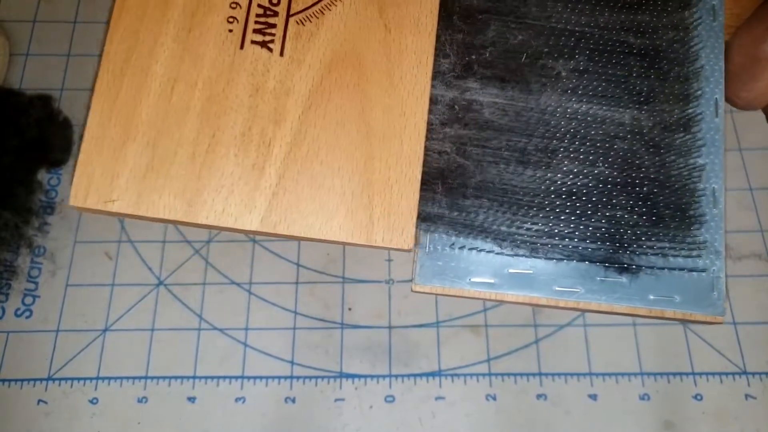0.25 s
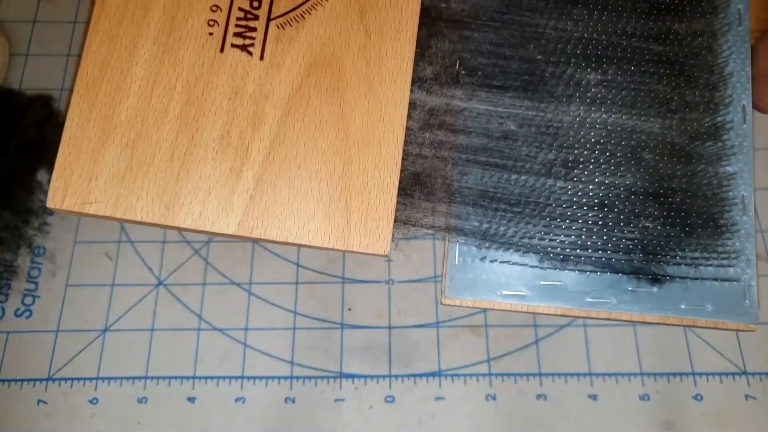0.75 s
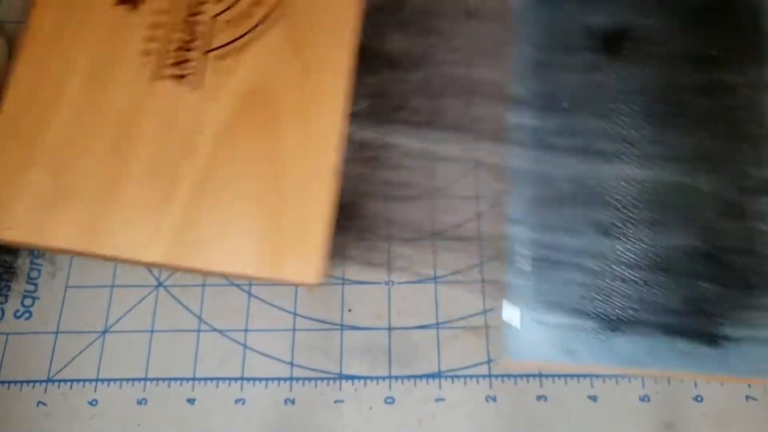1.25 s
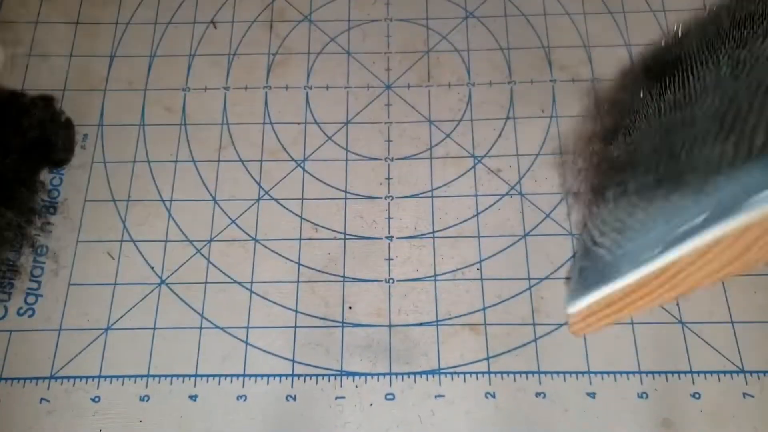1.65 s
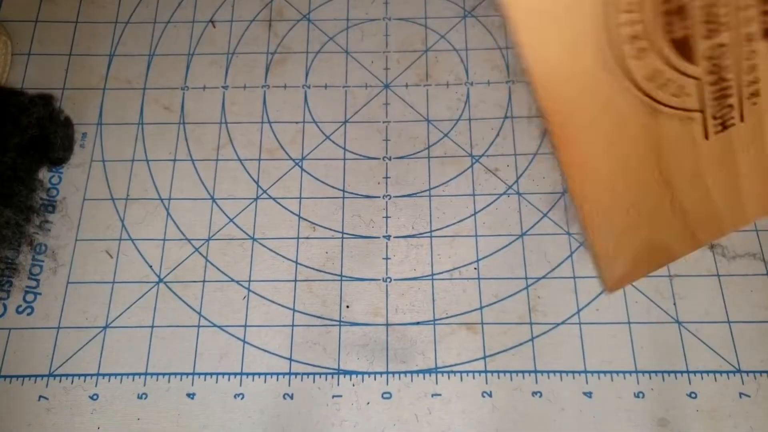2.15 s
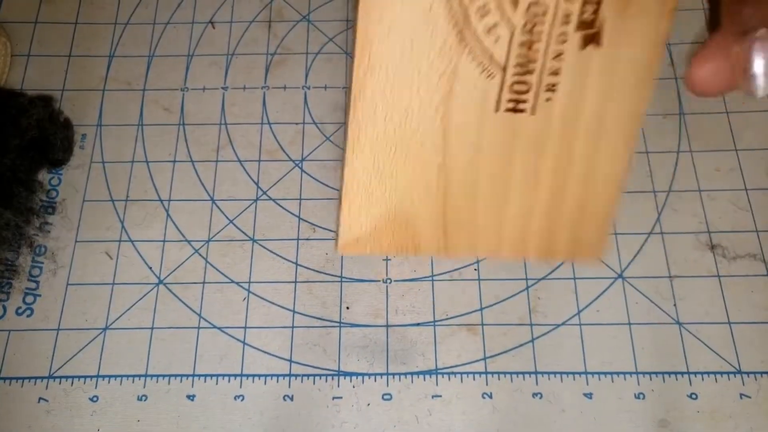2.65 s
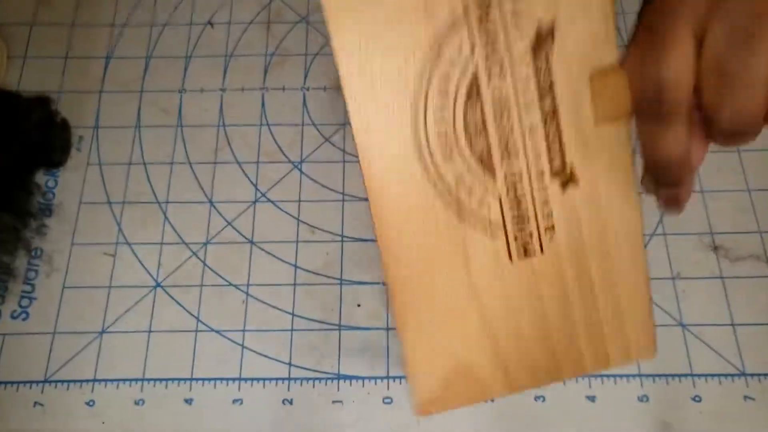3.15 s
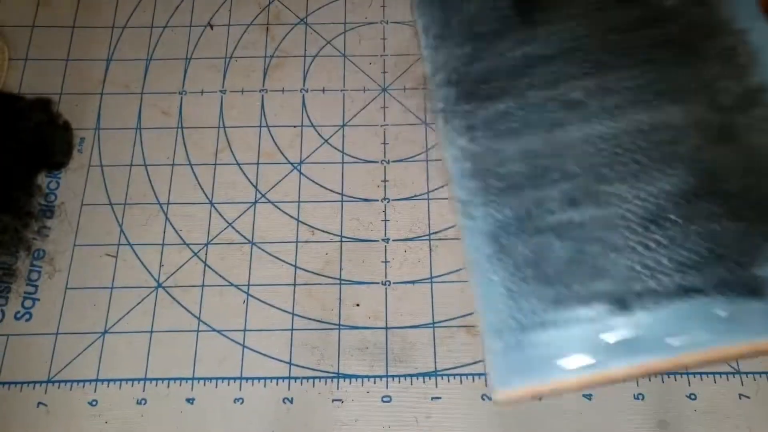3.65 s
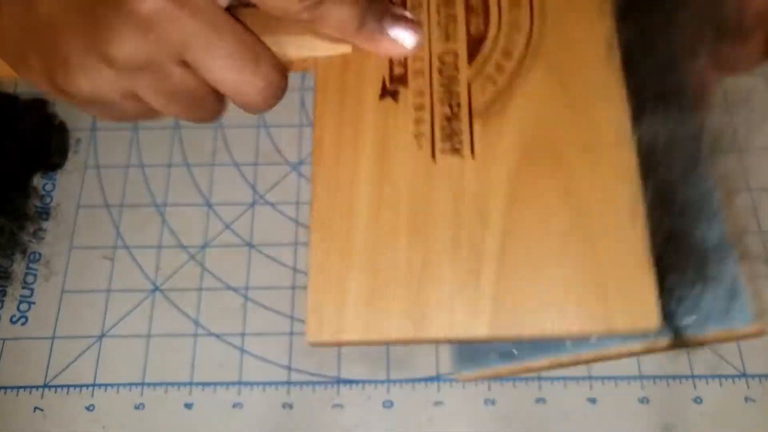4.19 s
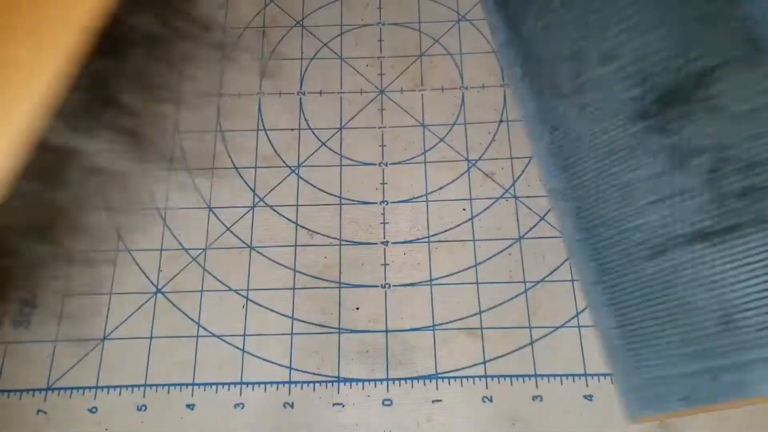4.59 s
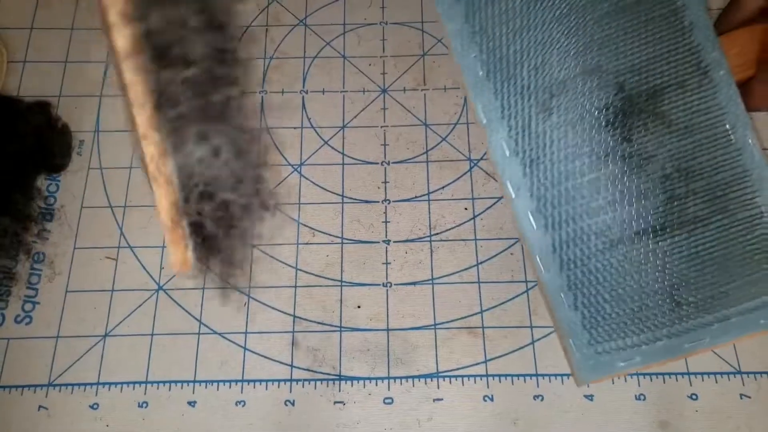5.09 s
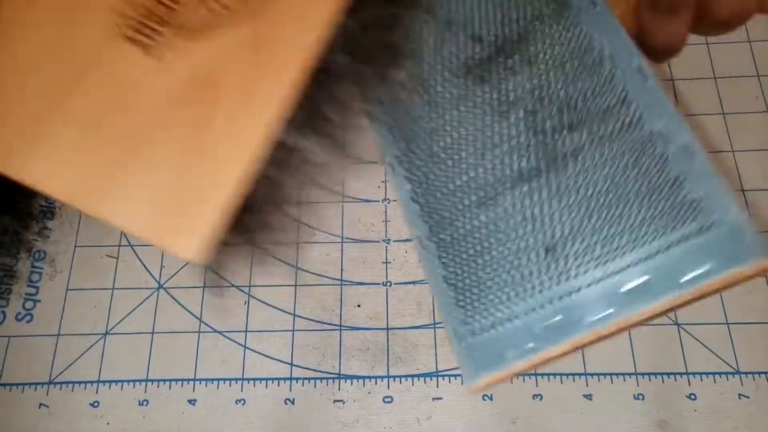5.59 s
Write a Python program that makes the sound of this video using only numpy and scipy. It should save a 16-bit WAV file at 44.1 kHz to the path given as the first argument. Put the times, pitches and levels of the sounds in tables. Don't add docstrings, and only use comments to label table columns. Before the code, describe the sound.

A close stereo microphone in a quiet room, with low building rumble and very faint hiss. From 0 to 0.5 s wire teeth draw softly through wool, a fine dry scratch with woody body and airy hiss; a short pull follows at 0.6-0.8 s, and a swelling one at 0.9-1.4 s, strongest near 1.25 s. From 1.7 to 2.8 s only faint skin rubs and handle squeezes, with a small woody tick at 2.07 s. At 2.83 s a paddle hits the table hard: bright crack, deep thump, short room tail; a softer knock follows at 3.08 s. Slight rubbing continues, with a tiny sharp click at 3.37 s. At 3.97 s teeth catch in a loud rattling snap, with an edge tap at 4.10 s and coarse scraping that swells around 4.2 s and fades by 4.5 s. Near silence, then a final crackly, uneven scrape at 5.43-5.75 s.

```python
import sys
import numpy as np
from scipy import signal
from scipy.fft import rfft, irfft
from scipy.io import wavfile

SR = 44100
rng = np.random.default_rng(int(sys.argv[2]) if len(sys.argv) > 2 else 0)


def gain_from_decibels(decibels):
    exponent = np.asarray(decibels, float) / 20
    return 10 ** exponent


def generate_wav(signal):
    frames = np.transpose(np.atleast_2d(signal))
    scaled = np.clip(frames, -1, 1) * 32767
    pcm = np.round(scaled).astype(np.int16)
    wavfile.write(sys.argv[1], SR, pcm)


N = 257103

# time_s, level_db, brightness_db
RUMBLE = [
    [(0.0, -61, 3), (0.39, -58.5, -7.5), (0.66, -64.5, 1), (1.08, -57.5, -3), (1.73, -59, -8),
     (2.15, -64.5, -3), (2.7, -57, -5.5), (3.25, -60, -3), (3.72, -64, -6.5), (3.95, -67.5, 1),
     (4.7, -65, 4.5), (5.13, -65, 3), (5.4, -60.5, -1), (5.83, -62.5, 8)],
]
# pitch_hz, level_db [dB per Hz]
DEEP_RUMBLE = [(20, -32), (32, -17), (45, 4.5), (62, 2), (95, -3), (130, -25), (200, -48)]
UPPER_RUMBLE = [(60, -38), (100, -8), (140, 1), (210, 1), (270, -7.5), (360, -15.5), (500, -28.5),
                (800, -59)]
# pitch_hz, level_db [dB per Hz]
MIC_HISS = [(260, -31), (450, -13.5), (680, -19), (1780, -23.5), (1950, -22.5), (2330, -22.5), (6730, -41),
            (16000, -24.5)]
MIC_HISS_DB = -79

# pitch_hz, likeness [1 = same]
FLOOR_LIKENESS = [(60, 0.91), (240, 0.87), (950, -1.3), (3770, -0.8), (15000, -0.9)]
NEAR_LIKENESS = [(60, -0.92), (180, 1), (550, 0.83), (1650, 0.47), (4970, 0.041), (15000, -1.7)]
HIT_LIKENESS = [(200, 0.95), (800, 0.85), (2000, 0.75), (5000, .6), (12000, .4)]
# pitch_hz, left_minus_right_db
LEFT_SHADOW = [(60, 2.5), (130, -8.5), (290, 0.5), (640, -3.5), (1410, -4), (3100, -8), (6820, -8),
               (15000, -23.5)]

# start_s, crack_db, thump_db, contact_ms, tail_db
KNOCKS = [
    (2.8287, -27, -3.5, 3.4, -34),
    (3.0826, -33, -11, 4.5, -38),
    (4.1015, -27.5, -33, 1.16, -57),
    (5.438, -54.5, -39, 2.06, -59),
]
# pitch_hz, level_db, t60_s
TABLE_MODES = [(43.97, -24.5, .2), (77.4, -13, 0.11), (110.7, -13, 0.11), (143, -14.5, 0.035),
               (200, -14.5, 0.038), (247.5, -23.5, 0.21), (335, -19, 0.049), (354, -18, .07),
               (450, -37.5, .05)]
# start_s, peak_db, pitch_hz, t60_s
TABLE_PUSHES = [
    (1.501, -41, 78.6, 0.058),
    (3.601, -43.5, 52.8, 0.22),
    (4.341, -41, 53, 0.25),
]
# pitch_hz, level_db [dB per Hz]
CRACK_COLOUR = [(200, -17), (800, 7), (1300, 1), (2000, 4), (3000, -9), (5000, -8.5), (9000, -15),
                (15000, -12.5)]
# pitch_hz, t60_s, level_db
ROOM_TAIL = [(179, .2, 7.5), (313, 0.16, 7), (545, 0.22, -6.5), (1100, 0.061, -7.5), (1750, 0.17, -10.5),
             (3350, 0.13, -12.5), (5500, 0.052, -9), (12100, 0.062, -12)]
HAZE_DB, HAZE_HOLD_MS, HAZE_T60_MS = -19.5, 33, 170
FLAT_MS, TILT_PER_CONTACT, THUMP_SKEW = 1.04, 1.3, 0.75

# start_s, peak_db, pitch_hz, ring_t60_ms
STRUCK_MODES = [(2.828, -28, 3100, 22), (2.8283, -32.5, 8500, 5.1), (2.8283, -32, 12000, 3),
                (2.832, -30, 500, 23), (4.1035, -33, 320, 20), (2.838, -44, 3070, 60),
                (2.828, -38, 5400, 12), (3.0825, -39.5, 754, 37), (3.0825, -42, 1800, 25),
                (3.086, -46, 1550, 27), (2.828, -30, 1800, 22), (2.827, -38.5, 3870, 16),
                (2.8286, -31.5, 860, 38), (2.838, -42, 1500, 57), (2.8285, -34.5, 1600, 20),
                (2.834, -35.5, 430, 80), (3.083, -30.5, 1330, 26), (3.095, -47, 1960, 77),
                (3.0828, -45, 2600, 18), (3.1498, -46, 2000, 28), (3.158, -57, 3860, 25),
                (3.159, -52, 1950, 45), (3.159, -56, 2950, 20), (4.0343, -38, 1200, 29),
                (4.0337, -39, 4200, 5), (4.0515, -34, 4200, 5), (4.0515, -40, 6700, 4),
                (4.1022, -34, 2070, 8), (4.1033, -39, 7400, 5.4), (4.1022, -42, 4000, 5.6),
                (3.636, -54, 13500, 3), (3.632, -60, 12000, 3), (4.0338, -34, 2500, 5),
                (3.369, -49, 6000, 2.9)]
# start_s, peak_db, pitch_hz, ring_t60_ms
BUMPS = [(2.0739, -39.5, 2660, 7.1), (2.0735, -51.5, 990, 17), (2.171, -53.5, 760, 13),
         (2.829, -25.5, 4880, 4), (3.082, -38, 4880, 13), (3.368, -53, 753, 35), (3.368, -47.5, 950, 17),
         (3.3687, -25, 13600, 1.6), (4.0337, -26, 2350, 2.6), (4.078, -46, 1290, 12),
         (4.1025, -33.5, 950, 11), (4.205, -34, 1100, 11), (5.438, -35.5, 395, 35)]
BUMP_MS, BUMP_BRIGHT_DB = 0.6, -23.5
# start_s, peak_db, pitch_hz, ring_t60_ms
TICKS = [(2.56, -70, 1930, 20), (3.1495, -60, 2020, 13), (3.984, -23, 373, 27), (4.0513, -31.5, 800, 8),
         (4.066, -44, 6200, 3.3), (5.478, -49, 2700, 5), (5.509, -48, 4300, 3), (5.607, -51, 1320, 10),
         (5.537, -48, 1700, 8), (5.535, -51, 4500, 5.4), (5.584, -50, 7160, 4)]
TICK_MS, TICK_BRIGHT_DB = 2.1, 0.5
# start_s, peak_db, pitch_hz, length_ms, bright_db
RATTLES = [(2.898, -40.5, 410, 23, -18), (3.157, -39.5, 450, 21, -18), (3.15, -43.5, 755, 8.7, -27),
           (3.9765, -26.5, 1120, 10, -10), (3.9815, -35.5, 3330, 1.6, -7), (4.1918, -41, 1100, 5.4, -12),
           (5.624, -45.5, 1360, 6.5, -15), (5.479, -44, 650, 8.8, -25), (3.9695, -35, 2500, 9.1, -1.5),
           (3.971, -31.5, 2100, 9.6, -5), (3.9695, -35, 1300, 8, -14.5), (3.972, -30, 820, 6, -20.5),
           (3.99, -39, 1100, 20, -20.5), (3.978, -30, 560, 10, -25), (3.9765, -27, 740, 12.4, -15),
           (3.979, -30.5, 450, 22, -20), (4.252, -44, 850, 13, -16), (4.291, -36, 830, 4.4, -11),
           (4.516, -47.5, 400, 14.3, -35), (5.437, -42.5, 1400, 4.4, -13), (5.477, -40.5, 1270, 14, -18),
           (5.517, -48, 870, 11, 4), (5.532, -47, 1230, 9.5, -4), (5.553, -38.5, 1420, 8, -18),
           (5.745, -49.5, 450, 14, -36), (5.768, -52.5, 260, 19, -40), (5.512, -49.5, 1900, 14, -4),
           (5.455, -46, 1270, 8, -13), (4.53, -58, 405, 40, -40)]
RATTLE_T60_MS = 24

# middle_s, length_ms, hiss_db, hollow_db, hollow_hz
GRIPS = [(1.752, 116, -69, -79, 4700), (1.852, 80, -62, -66, 3250), (1.97, 200, -72.5, -80.5, 2800),
         (2.055, 150, -65, -64.5, 2820), (2.02, 67, -100, -67, 3900), (2.055, 38, -100, -60.5, 3800),
         (2.065, 48, -100, -61, 5500), (2.15, 180, -78, -74.5, 3970), (2.25, 102, -72.5, -69, 5500),
         (2.34, 170, -82.5, -94, 4780), (2.441, 130, -65.5, -76.5, 3820), (2.585, 96, -83, -57, 14700),
         (2.7, 120, -92, -69, 14800), (2.779, 91, -65, -71, 4340), (2.969, 86, -81.5, -74.5, 4240),
         (3.159, 40, -66.5, -73, 4000), (3.216, 86, -75, -74, 4700), (3.33, 140, -74, -84, 4100),
         (3.385, 84, -66.5, -70, 3820), (3.47, 210, -66.5, -78, 4000), (3.55, 120, -83, -80.5, 3470),
         (3.647, 64, -84, -62, 12900), (3.61, 62, -97, -70.5, 14100), (3.72, 100, -100, -77.5, 13900),
         (4.601, 79, -82, -101, 5000)]
# middle_s, length_ms, level_db
SQUEEZES = [(1.751, 124, -78), (1.97, 140, -83), (2.149, 290, -75), (2.28, 180, -87), (2.443, 200, -77),
            (2.62, 270, -83.5), (2.78, 110, -71), (3.216, 79, -71.5), (3.389, 61, -64)]
# pitch_hz, level_db [dB per Hz]
SKIN_COLOUR = [(3000, -37.5), (5000, -9.5), (7000, -8.5), (9500, -11.5), (12000, -2), (15000, 2.5),
               (15700, -1)]

# time_s, effort_db [paddle level]
STROKES = [
    [(0.0, -62), (0.04, -61), (0.146, -64), (0.296, -62.5), (0.442, -71), (0.528, -69.5)],
    [(0.586, -61.5), (0.65, -57), (0.712, -59.5), (0.788, -78.5), (0.82, -86)],
    [(0.908, -76.5), (0.942, -69), (1.008, -64), (1.098, -64), (1.18, -61), (1.224, -54.5), (1.302, -54.5),
     (1.42, -89), (1.49, -101)],
    [(3.99, -41.5), (4.019, -51.5), (4.07, -53.5), (4.094, -63)],
    [(4.112, -57), (4.136, -58.5), (4.204, -48), (4.25, -54), (4.292, -53), (4.312, -57.5), (4.422, -62.5),
     (4.502, -85.5), (4.6, -99)],
    [(5.434, -53.5), (5.458, -56), (5.5, -57.5), (5.52, -53), (5.578, -59.5), (5.63, -54.5), (5.668, -58.5),
     (5.726, -79.5), (5.83, -92)],
]
# time_s, share [0-1]
MESH_SHARE = [(3.9, 0), (3.95, 1), (4.22, 0.75), (4.29, 0.22), (4.6, 0.12), (5.4, .9), (5.58, 0.76),
              (5.66, 0.2)]
# pitch_hz, width_hz, level_db
WOOL_PADDLE = [(306.4, 97, -11), (637, 69, -4.5), (850, 290, 1), (1078, 196, 2.5), (1347, 350, -8),
               (1897, 100, -14)]
MESHED_PADDLE = [(356, 110, -4.5), (534, 130, 0.5), (630, 240, 2.5), (950, 410, -2.5), (1290, 190, -2),
                 (1900, 830, -7)]
# pitch_hz, level_db [dB per Hz]
SCRATCH_COLOUR = [(1200, -29), (2000, -7.5), (3000, -7.5), (4500, -10), (6000, -5), (8000, -22.5)]
WOOL_FIBRE = [(3200, -22.5), (5600, -10), (7500, -3), (8500, -7.5), (9800, -9), (12000, -3.5), (15000, 1),
              (15700, 4.5)]
MESHED_FIBRE = [(4500, -29), (6200, 2.5), (7500, -2), (9800, -15), (12000, -6.5), (15000, -5),
                (15700, -0.5)]
# level_db [at -60 dB effort], slope [dB per dB]
WOOL_SCRATCH = (-76, 1.4)
WOOL_HISS = (-58.5, 0.86)
BARE_SCRATCH = (-66, 0.84)
BARE_HISS = (-68.5, 0.78)


def in_time(spans):
    time_s, *columns = np.transpose(np.concatenate(spans))
    return [np.interp(np.arange(N) / SR, time_s, column) for column in columns]


def at_hz(points, hz):
    points = np.array(points)
    return np.interp(np.log(hz + 1), np.log(points[:, 0]), points[:, 1])


def rms_one(x):
    return x / np.sqrt(np.mean(x ** 2) + 1e-20)


def colour(x, spectrum):
    size = 8192
    hz = np.arange(size // 2 + 1) * SR / size
    cepstrum = irfft(np.log(gain_from_decibels(at_hz(spectrum, hz))))
    cepstrum[1:size // 2] *= 2
    cepstrum[size // 2 + 1:] = 0
    impulse = irfft(np.exp(rfft(cepstrum)))
    return signal.fftconvolve(x, impulse[None], axes=-1)[:, :N]


def band_filter(x, order, hz, kind):
    return signal.sosfilt(signal.butter(order, hz, kind, fs=SR, output="sos"), x)


def ring(x, pitch_hz, t60_s):
    radius, turn = gain_from_decibels(-60 / (t60_s * SR)), 2 * np.pi * pitch_hz / SR
    return signal.lfilter([0, np.sin(turn)], [1, -2 * radius * np.cos(turn), radius * radius], x + 1e-18)


def drift(rate_hz):
    steps = rng.standard_normal(4000)
    return rms_one(np.interp(np.arange(N) / SR * rate_hz * 2, np.arange(len(steps)), steps))


def burst(start_s, length_ms, t60_ms):
    age = np.arange(N) / SR - start_s
    return (age >= 0) * gain_from_decibels(-60 * np.clip(age - length_ms / 1000, 0, 2) / (t60_ms / 1000))


def swell(cut, middle_s, length_ms):
    age = np.arange(N)[cut] / SR - middle_s
    return np.exp(-2 * (age / (length_ms / 2000)) ** 2)


def ports(pair, likeness, balance):
    hz = np.arange(N // 2 + 1) * SR / N
    alike = np.clip(at_hz(likeness, hz), 0, 1)
    first, second = rfft(pair)
    left = (alike * first + np.sqrt(1 - alike ** 2) * second) * gain_from_decibels(at_hz(balance, hz))
    return irfft([left, first], N)


def releases(per_s, spread_db):
    force_db = spread_db * np.minimum(rng.exponential(1, (2, N)), 5)
    sizes = gain_from_decibels(force_db) * rng.choice([-1, 1], (2, N))
    return sizes * (rng.random((2, N)) < per_s / SR)


def room_tone():
    deep_db, bright_db = in_time(RUMBLE)
    deep, upper, hiss = (rms_one(colour(rng.standard_normal((2, N)), spectrum))
                         for spectrum in (DEEP_RUMBLE, UPPER_RUMBLE, MIC_HISS))
    noise = gain_from_decibels(deep_db + 1.5 + 2.1 * drift(7.9)) * deep
    noise += gain_from_decibels(deep_db + bright_db + 2.0) * upper
    noise += gain_from_decibels(MIC_HISS_DB) * hiss
    return ports(noise, FLOOR_LIKENESS, [(60, -0.16), (250, -4.5), (700, 1.6), (2400, 4.0), (8000, -2.6)])


def table_thumps():
    t, push, dip = np.arange(N) / SR, np.zeros(N), np.zeros(N)
    for start_s, _, thump_db, contact_ms, _ in KNOCKS:
        delay_s = TILT_PER_CONTACT * (contact_ms - FLAT_MS) / 1000
        phase = np.clip((t - start_s - delay_s) / (contact_ms / 1000), 0, 1)
        push += gain_from_decibels(thump_db) * np.sin(np.pi * phase ** THUMP_SKEW) ** 2
        lead = np.clip((t - start_s) / (delay_s + 0.00039), 0, 1)
        dip -= gain_from_decibels(thump_db - 14.5) * np.sin(np.pi * lead)
    out = push + dip
    for pitch_hz, level_db, t60_s in TABLE_MODES:
        speed = np.gradient(ring(push, pitch_hz, t60_s)) * SR / (2 * np.pi * pitch_hz)
        out += gain_from_decibels(level_db - 38.5) * speed
    for start_s, peak_db, pitch_hz, t60_s in TABLE_PUSHES:
        age = np.clip(t - start_s, 0, 2)
        onset = 1 - np.exp(-age / 0.0013)
        out += gain_from_decibels(peak_db - 60 * age / t60_s) * onset * np.sin(2 * np.pi * pitch_hz * age)
    left = gain_from_decibels(0.5) * signal.lfilter([0.12], [1, -0.88], out)
    return np.array([left, out])


def knock_cracks():
    out, noise = np.zeros((2, N)), rng.standard_normal((2, N))
    crack = rms_one(colour(noise, CRACK_COLOUR))
    for start_s, crack_db, *_ in KNOCKS:
        out += gain_from_decibels(crack_db - 5.5) * burst(start_s, 0.28, 25) * crack
    for pitch_hz, t60_s, level_db in ROOM_TAIL:
        band = rms_one(band_filter(noise[::-1], 4, [pitch_hz * 0.76, pitch_hz * 1.32], "band"))
        for start_s, *_, tail_db in KNOCKS:
            out += gain_from_decibels(tail_db + level_db) * burst(start_s + 0.0033, 2.8, 1000 * t60_s) * band
    haze = band_filter(noise[:, ::-1], 2, 4200, "high")
    for start_s, *_, tail_db in KNOCKS:
        out += gain_from_decibels(tail_db + HAZE_DB) * burst(start_s + 0.009, HAZE_HOLD_MS, HAZE_T60_MS) * haze
    return out


def struck_paddle():
    out = np.zeros(N)
    for start_s, peak_db, pitch_hz, t60_ms in STRUCK_MODES:
        start, touch = int(start_s * SR), np.zeros(SR // 4)
        touch[:2] = 0.5
        out[start:start + len(touch)] += gain_from_decibels(peak_db) * ring(touch, pitch_hz, t60_ms / 1000)
    return out


def tooth_snaps():
    out, rattle = np.zeros((2, N)), releases(per_s=4600, spread_db=0.0)
    tick = rms_one(colour(rattle, CRACK_COLOUR))
    catches = [(*bump, BUMP_BRIGHT_DB, BUMP_MS) for bump in BUMPS]
    catches += [(*spring, TICK_BRIGHT_DB, TICK_MS) for spring in TICKS]
    catches += [(start_s, peak_db, pitch_hz, RATTLE_T60_MS, bright_db, length_ms)
                for start_s, peak_db, pitch_hz, length_ms, bright_db in RATTLES]
    for start_s, peak_db, pitch_hz, t60_ms, bright_db, length_ms in catches:
        cut = slice(int(start_s * SR), int((start_s + 0.2) * SR))
        shape = burst(start_s, length_ms, 6)[cut]
        force = rattle[:, cut] * shape
        force[:, 1] += 4.5 * min(1, 3.7 / length_ms)
        body = ring(force, pitch_hz, t60_ms / 1000)
        bright = gain_from_decibels(bright_db - 6.0) * shape * tick[:, cut]
        out[:, cut] += gain_from_decibels(peak_db) * (body / np.abs(body).max() + bright)
    return out


def hand_grips():
    out, rub = np.zeros((2, N)), rms_one(releases(per_s=9000, spread_db=2) * gain_from_decibels(drift(40)))
    skin = rms_one(colour(rub, SKIN_COLOUR))
    for middle_s, length_ms, hiss_db, hollow_db, hollow_hz in GRIPS:
        cut = slice(int((middle_s - 0.2) * SR), int((middle_s + 0.2) * SR))
        t60_s = 7 / hollow_hz
        hollow = rms_one(ring(ring(rub[:, cut], hollow_hz, t60_s), hollow_hz, t60_s))
        slide = gain_from_decibels(hiss_db + 10.5) * skin[:, cut] + gain_from_decibels(hollow_db) * hollow
        out[:, cut] += swell(cut, middle_s, length_ms) * slide
    firm = sum(gain_from_decibels(level_db) * swell(slice(None), middle_s, length_ms)
               for middle_s, length_ms, level_db in SQUEEZES)
    return out + firm * rms_one(ring(rub, 850, 0.0086))


def paddle(teeth, modes):
    out = 0
    for k, (pitch_hz, width_hz, level_db) in enumerate(modes):
        gain = (-1) ** k * gain_from_decibels(level_db) * np.sqrt(width_hz)
        out = out + gain * ring(teeth, pitch_hz, 1.52 / width_hz)
    return rms_one(out)


def follows(law, effort_db):
    level_db, slope = law
    return level_db + slope * (effort_db + 60)


def combing():
    effort_db, = in_time(STROKES)
    t, engaged = np.arange(N) / SR, np.ones(N)
    for stroke, following in zip(STROKES, STROKES[1:]):
        lift_s, land_s = stroke[-1][0], following[0][0]
        if land_s - lift_s > 0.25:
            engaged[(t > lift_s) & (t < land_s)] = 0
    fine = releases(per_s=5400, spread_db=0.0) * gain_from_decibels(0.35 * drift(33))
    coarse = rms_one(releases(per_s=1500, spread_db=4) * gain_from_decibels(3 * drift(60)))
    hairs = rms_one(releases(per_s=7800, spread_db=1.1))
    share = np.clip(in_time([MESH_SHARE])[0], 0, 1)
    bare = share > 0
    scratch_db = np.where(bare, follows(BARE_SCRATCH, effort_db), follows(WOOL_SCRATCH, effort_db))
    fibre_db = np.where(bare, follows(BARE_HISS, effort_db), follows(WOOL_HISS, effort_db))
    wood = np.sqrt(share) * paddle(coarse, MESHED_PADDLE) + np.sqrt(1 - share) * paddle(fine, WOOL_PADDLE)
    scratch = rms_one(colour(hairs + 0.78 * share * coarse, SCRATCH_COLOUR))
    meshed_hiss = rms_one(colour(hairs + 0.87 * coarse, MESHED_FIBRE))
    fibre = np.where(bare, meshed_hiss, rms_one(colour(hairs, WOOL_FIBRE)))
    layers = gain_from_decibels(effort_db + 3.0) * wood
    layers += gain_from_decibels(scratch_db + 2.5) * scratch
    layers += gain_from_decibels(fibre_db + 10.5) * fibre
    return engaged * layers


def scene():
    rubbing = ports(combing() + hand_grips(), NEAR_LIKENESS, LEFT_SHADOW)
    hits = ports(tooth_snaps() + knock_cracks() + struck_paddle(), HIT_LIKENESS, LEFT_SHADOW)
    return rubbing + hits + table_thumps() + room_tone()


def top_cut(x):
    return signal.sosfilt(signal.butter(12, 16960, fs=SR, output="sos"), x)


def record(dry):
    wet = band_filter(dry, 2, 46, "high")
    mix = signal.sosfilt(signal.cheby2(10, 30, 16100, fs=SR, output="sos"), wet)
    return top_cut(mix)


dry = scene()
out = record(dry)
generate_wav(out)
```